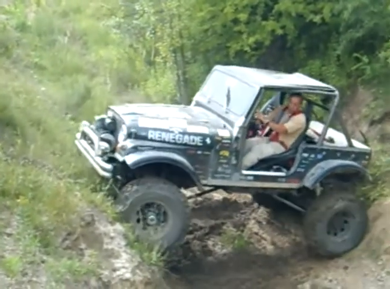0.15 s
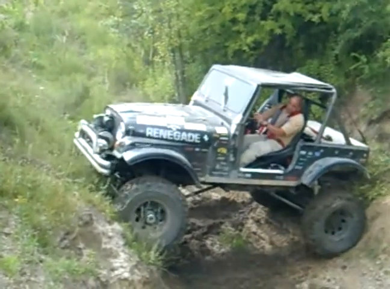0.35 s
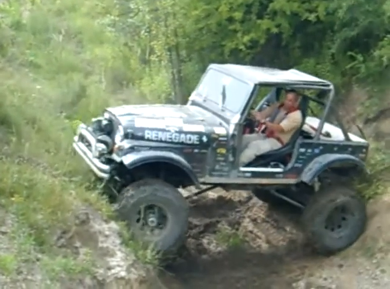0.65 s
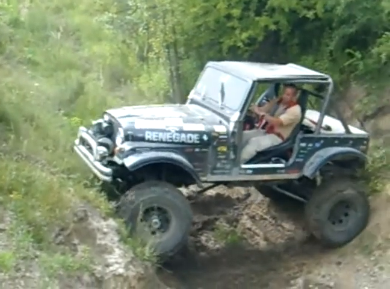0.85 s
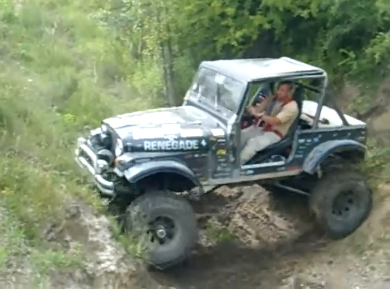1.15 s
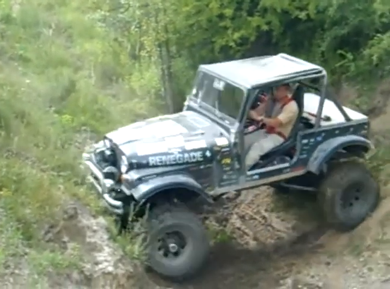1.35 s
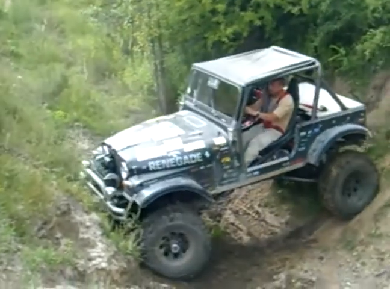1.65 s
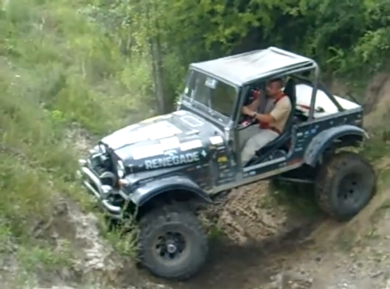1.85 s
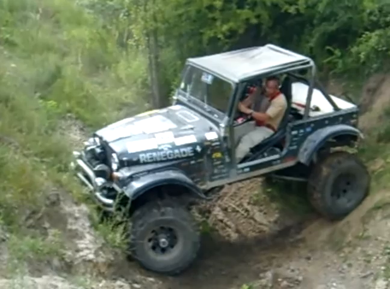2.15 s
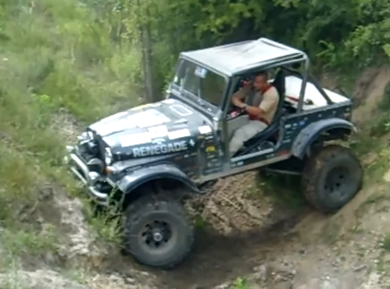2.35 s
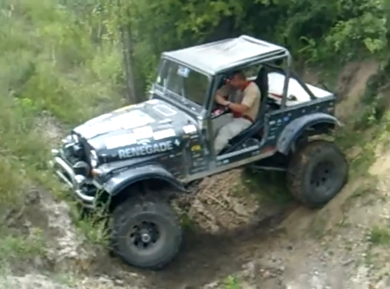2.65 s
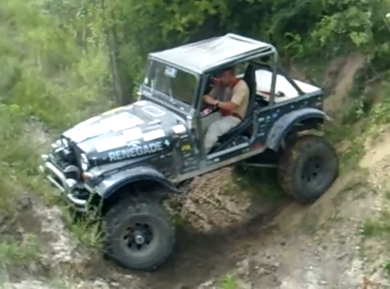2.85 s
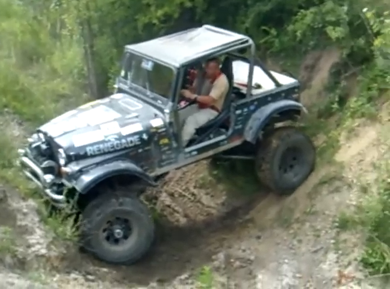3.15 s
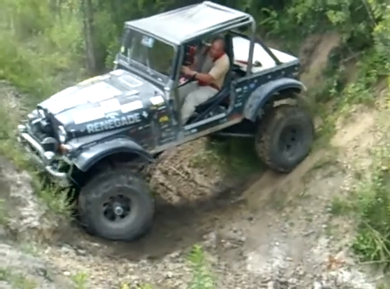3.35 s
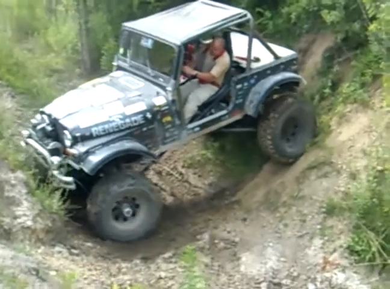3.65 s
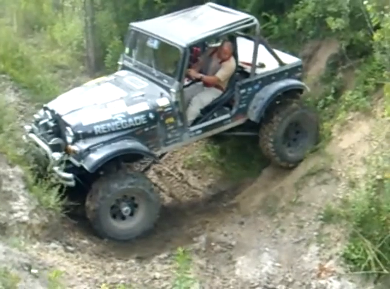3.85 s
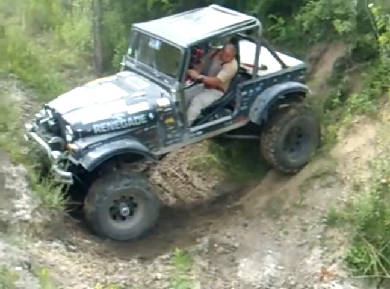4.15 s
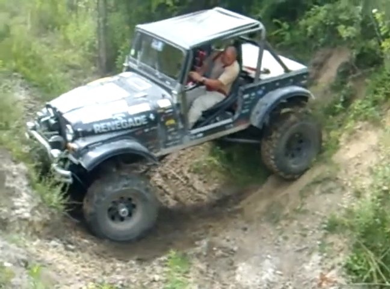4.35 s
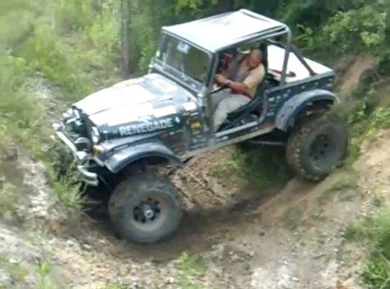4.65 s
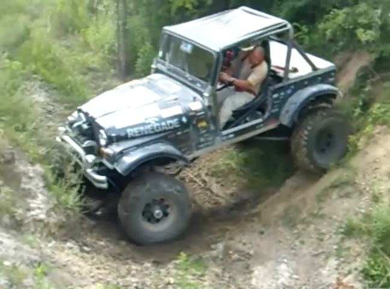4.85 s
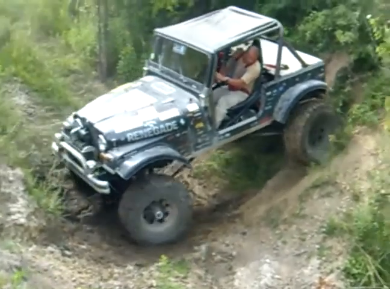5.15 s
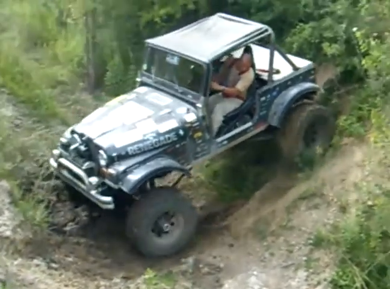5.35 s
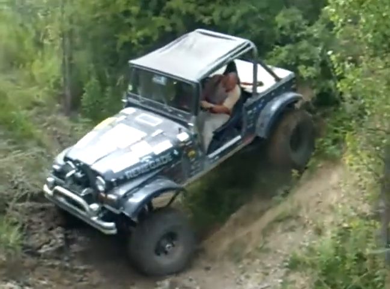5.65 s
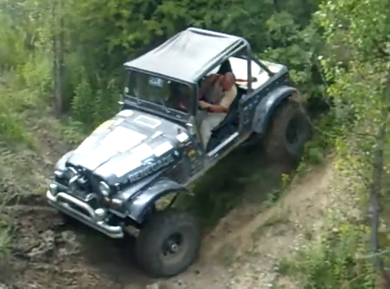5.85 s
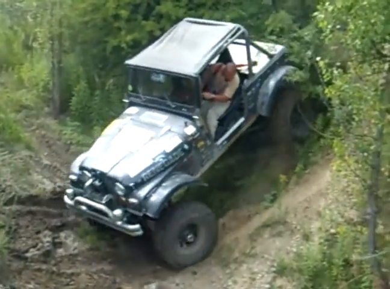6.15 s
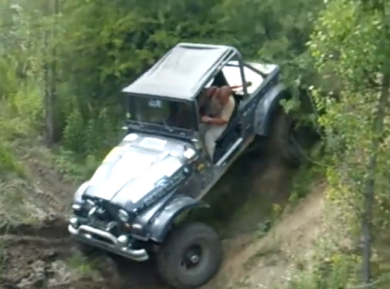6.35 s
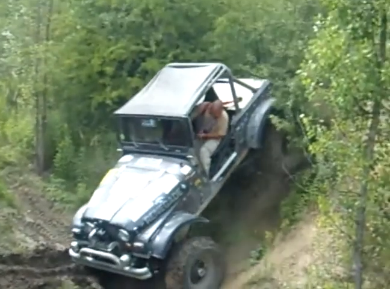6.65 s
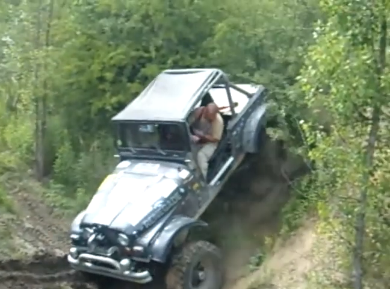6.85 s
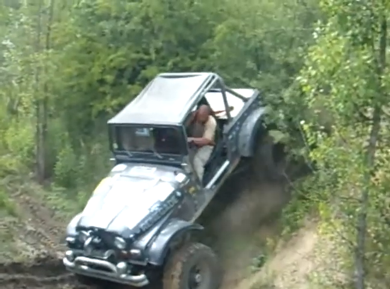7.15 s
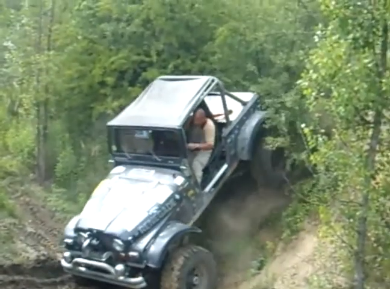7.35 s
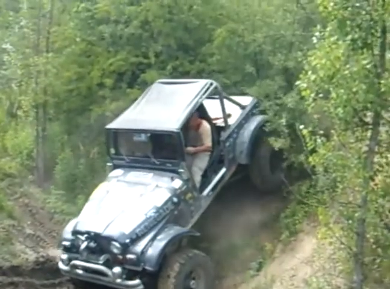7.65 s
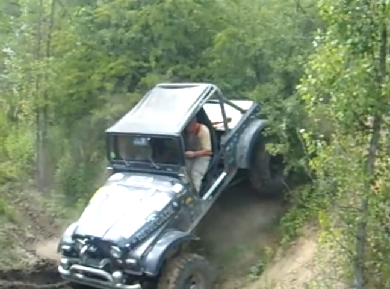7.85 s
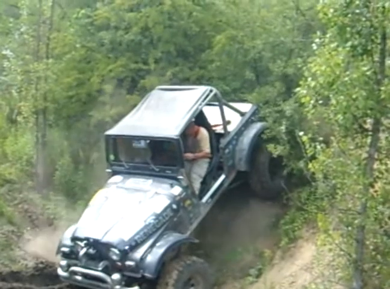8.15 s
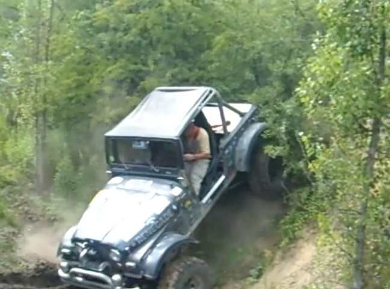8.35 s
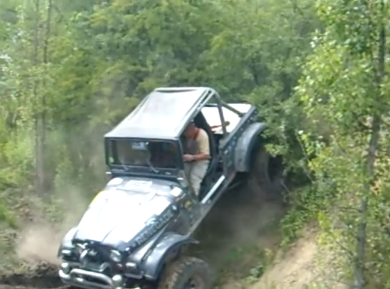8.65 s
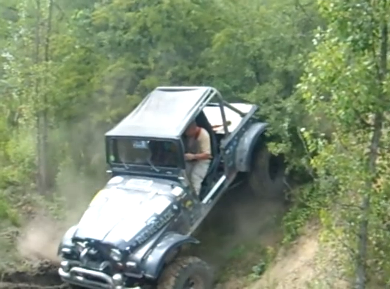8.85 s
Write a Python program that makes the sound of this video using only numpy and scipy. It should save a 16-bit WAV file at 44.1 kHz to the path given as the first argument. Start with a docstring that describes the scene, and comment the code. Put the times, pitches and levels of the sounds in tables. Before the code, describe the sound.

A big V8 off-roader blips its throttle three times on a dirt slope, howls at high revs, then sinks to a faltering, clinking idle.

```python
"""A V8 off-road vehicle revs in bursts on a dirt slope, then nearly stalls and lopes at idle.
Each firing drives tones and burble in the pipes, with gas roar, hiss and a rattle; pipe notes howl at
high revs and low thumps mark strong firings. Tyres crunch grit as short bursts of cracks, loose parts
clink as dying notes, the slope echoes both, and wind is low noise on the microphone.
A narrow-band recorder with a soft preamplifier cuts off the highest peaks."""
import sys
import numpy as np
from scipy import signal
from scipy.fft import rfft, irfft, next_fast_len
from scipy.io import wavfile
from scipy.ndimage import uniform_filter1d

SR = 44100
rng = np.random.default_rng(int(sys.argv[2]) if len(sys.argv) > 2 else 0)


def unload_audio(sound):
    """Save the sound as a 16-bit wav file, at the path given as the first command line argument."""
    columns = np.transpose(np.atleast_2d(sound))
    # keep every value between -1 and 1, then stretch to whole-number steps
    steps = np.round(np.clip(columns, -1, 1) * 32767)
    wavfile.write(sys.argv[1], SR, steps.astype(np.int16))


def how_loud(loudness_db):
    """Turn decibels into a plain amplitude multiplier (0 dB gives 1, 20 dB gives 10)."""
    steps = np.asarray(loudness_db, float) / 20
    return 10 ** steps


N = 397341
REFERENCE_HZ = 100  # firing rate at which the layers that follow the engine have their base level

# engine speed and its plain tone: t/s, firing rate f/Hz, tone level/dB (rms)
SPEED = [(0.0, 83.5, -22), (0.12, 80.6, -20.5), (0.26, 69.05, -23.5), (0.35, 63.8, -36), (0.6, 62.16, -34),
         (0.75, 64.6, -28), (0.84, 84.5, -14), (0.93, 106.5, -8.5), (1.0, 121.7, -12.5), (1.06, 129.5, -20),
         (1.18, 121.9, -17), (1.4, 107.1, -29.5), (1.65, 94.6, -30), (2.01, 81.5, -25),
         (2.36, 72.35, -31.5), (2.58, 68.55, -31.5), (2.8, 69.86, -29), (2.93, 95.2, -14),
         (3.0, 109.6, -14), (3.08, 116.5, -22), (3.21, 107.5, -26), (3.33, 110.9, -21), (3.67, 110.8, -25),
         (3.89, 93.7, -28), (4.06, 85.8, -31.5), (4.29, 84.2, -18), (4.42, 102.3, -18.5),
         (4.52, 114.3, -18.5), (4.59, 115.8, -26), (4.7, 103.1, -29), (4.79, 103.4, -18.5),
         (4.99, 134.7, -21), (5.12, 149.3, -26.5), (5.32, 157.1, -24.5), (5.54, 188.7, -12),
         (5.66, 205, -11.5), (5.77, 212.8, -15.5), (6.02, 206.9, -7.5), (6.15, 236.5, -20.5),
         (6.25, 260.5, -11), (6.34, 264.4, -19.5), (6.47, 238.6, -20.5), (6.56, 239.8, -10.5),
         (6.72, 272.9, -33.5), (6.85, 259.9, -18.5), (7.0, 225.1, -34.5), (7.2, 170.6, -32.5),
         (7.35, 125.4, -32), (7.5, 94.6, -25), (7.68, 75.06, -21.5), (7.83, 63.8, -33), (8.2, 44.53, -34),
         (8.44, 32.9, -38), (8.58, 54.87, -51), (8.75, 59.1, -38), (9.01, 57.2, -53)]


def evened(x):
    """Scales to rms 1."""
    return x / np.sqrt(np.mean(x ** 2) + 1e-20)


def columns(rows):
    """Table columns after the time, joined by straight lines at every sample."""
    s, *rest = np.transpose(rows)
    return [np.interp(np.arange(N) / SR, s, c) for c in rest]


def coloured(x, points):
    """Filters x by a spectrum of (Hz, dB) points."""
    size = next_fast_len(len(x))
    hz = np.fft.rfftfreq(size, 1 / SR)
    f, db = np.transpose(points)
    gain = how_loud(np.interp(np.log(hz + 1), np.log(f + 1), db))
    return irfft(rfft(x, size) * gain, size)[:len(x)]


def resonate(x, hz, width):
    """A fixed resonance with gain 1 at its centre."""
    return signal.lfilter(*signal.iirpeak(hz, hz / width, SR), x)


def slow(hz):
    """Smooth chance of rms 1 that wanders at rates up to about hz."""
    lowpass = signal.butter(2, hz, fs=SR, output="sos")
    return evened(signal.sosfilt(lowpass, rng.standard_normal(N)))


def add(mix, s, sound):
    """Mixes sound in from time s."""
    part = mix[round(s * SR):][:len(sound)]
    part += sound[:len(part)]


def steadied(x, size=6000):
    """Divides out the slow level so that engine speed alone does not set loudness."""
    power = uniform_filter1d(uniform_filter1d(x ** 2, size), size)
    return x / np.sqrt(power + 1e-12)


def smeared(x, longest_s=0.0296):
    """Each pitch leaves the pipes after its own delay, so pulses blur while their colour stays."""
    size = next_fast_len(len(x))
    delay = uniform_filter1d(rng.standard_normal(size // 2 + 1), size * 30 // SR)
    delay_s = longest_s * (1 + np.tanh(evened(delay))) / 2
    phase = 2 * np.pi * np.cumsum(delay_s) * SR / size
    return irfft(rfft(x, size) * np.exp(-1j * phase), size)[:len(x)]


def follows(flow_db, hz, base_db, flow_share, db_per_octave):
    """A layer grows with a share of the change in gas flow, and by some dB per octave of speed."""
    reference_flow_db = -25
    return base_db + flow_share * (flow_db - reference_flow_db) + db_per_octave * np.log2(hz / REFERENCE_HZ)


def pipe_lift(hz):
    """The pipes lift a tone (dB) near some notes, choke it near another and radiate deep tones little."""
    # notes of the pipes: f/Hz, width/Hz, lift/dB
    pipe_notes = [(95, 18, 3), (124, 16, 1.5), (192, 23, 8.5), (242, 44, -2), (298.3, 59.4, 9.5),
                  (550, 71, 7)]
    lift = sum(db / (1 + (2 * (hz - f) / w) ** 2) for f, w, db in pipe_notes)
    low = (80 / hz) ** 8
    high = (hz / 350) ** 16
    shelf_db = -5.5  # tones above about 350 Hz come out weaker
    return lift - 10 * np.log10(1 + low) + shelf_db * high / (1 + high)


def firing_tones(turns, hz, tone_db, bank_db):
    """Even firing gives one tone; banks that fire unevenly add tones at eighths of the firing rate."""
    # which eighths of the firing rate sound: number of eighths
    eighths = [5, 6, 11, 12, 13, 14, 15, 16, 21, 22, 23]
    # strength of each of these tones, relative to the bank level: level/dB
    eighth_levels = [-2.5, -4.5, -4, -12.5, -1.5, -6.5, -13, -1, -8, -14.5, -12.5]
    waver_db, wander_db, drift_rad = 1.4, 2.5, 0.2  # quick and slow unevenness of level, and of phase
    tones = how_loud(tone_db + waver_db * slow(27)) * np.sin(2 * np.pi * turns)
    for k, db in zip(eighths, eighth_levels):
        level_db = bank_db + db + pipe_lift(k / 8 * hz)
        level_db = level_db + wander_db * slow(2.27) + waver_db * slow(14)
        tones += how_loud(level_db) * np.sin(2 * np.pi * k / 8 * turns + drift_rad * slow(5.9))
    return np.sqrt(2) * tones  # so that the levels are rms


def firing_surplus(count, regular):
    """Each cylinder has its own strength, and no two cycles are alike."""
    # surplus of each firing over the mean, in firing order: relative strength
    cylinders = [1.21, 0.41, -0.38, 0.64, -0.85, -0.69, 0.69, 0.0055]
    pattern = evened(np.array(cylinders))[count % 8]
    chance = rng.standard_normal(count[-1] + 1)[count]
    return np.sqrt(regular) * pattern + np.sqrt(1 - regular) * chance


def burble(fired, surplus):
    """Uneven firing pulses and turbulent gas boom in the pipes."""
    # colour of a burble pulse leaving the pipes: f/Hz, level/dB
    pipe = [(15, -26), (45, -13), (80, -7), (110, -10), (135, -5), (160, -9), (190, 2), (215, 0),
            (260, -1.5), (300, -4.5), (325, -1.3), (350, -7.5), (385, -7), (600, -23), (1500, -53)]
    gas_share = 0.2
    pulses = steadied(coloured(smeared(fired * surplus), pipe))
    gas = evened(coloured(rng.standard_normal(N), pipe))
    return np.sqrt(1 - gas_share) * pulses + np.sqrt(gas_share) * gas


def roar(puff, fired, surplus, hz):
    """Each opening valve lets out a crack and a puff of gas, which ring the pipes and body."""
    # resonances of pipes and body: f/Hz, width of one pass/Hz, level/dB
    body = [(503, 124, 2.5), (645.6, 205, 2.5), (861, 256, 1), (1022, 690, -2), (1267, 1620, -9.5)]
    gate, rough, crack = 0.46, 0.97, 0.41  # share of puffs, unevenness of cracks, level of cracks
    gas = evened((1 - gate + gate * puff) * rng.standard_normal(N))
    drive = gas + crack * steadied(smeared(fired * (1 + rough * surplus), 0.008014))
    rung = np.zeros(N)
    for k, (f, w, db) in enumerate(body):
        twice = resonate(resonate(drive, f, w), f, w)
        rung += (-1.) ** k * how_loud(db) * twice
    rung = steadied(rung)
    # from 150 to 240 firings a second the roar spreads down into the gap under the body resonances
    fill = np.clip((hz - 150) / 90, 0, 1)
    thin = signal.sosfiltfilt(signal.butter(2, 380, "high", fs=SR, output="sos"), rung)
    return fill * rung + (1 - fill) * thin


def hiss(puff):
    """Escaping gas hisses, a little louder in each puff."""
    # colour of the hiss: f/Hz, level/dB per Hz
    hiss_colour = [(590, -18), (1000, 3.5), (1160, -24.5), (1430, -3), (1790, -7), (2240, -5), (4410, -8),
                   (5140, -10.5), (5600, -21), (7280, -68), (12300, -120)]
    gate = 0.17  # share of puffs
    return evened(coloured((1 - gate + gate * puff) * rng.standard_normal(N), hiss_colour))


def rattle(puff, hz, climb):
    """The engine bay rattles in a narrow band at each firing, more while revs climb."""
    noise = how_loud(3.0 * slow(30)) * puff * rng.standard_normal(N)
    centre_hz, width_hz = 4560, 500
    ring = steadied(resonate(resonate(noise, centre_hz, width_hz), centre_hz, width_hz))
    climb_hz_per_s = climb * hz * np.log(2)
    # dB relative to the hiss, dB per Hz/s of climb, dB per octave of speed
    return how_loud(-18.5 + 0.0556 * climb_hz_per_s - 4.5 * np.log2(hz / REFERENCE_HZ)) * ring


def engine():
    """Firing tones, burble, roar, hiss and rattle, all locked to the count of firings."""
    # gas flow, which sets the roar: t/s, level/dB
    load = [(0.0, -33), (0.45, -38.5), (0.79, -37), (0.84, -29), (0.93, -16.5), (1.0, -21), (1.06, -22.5),
            (1.2, -26), (1.96, -34.5), (2.76, -38), (2.88, -30.5), (2.96, -22), (3.06, -23), (3.14, -28),
            (3.59, -25), (3.84, -30.5), (4.24, -35), (4.36, -28.5), (4.54, -24), (4.72, -29.5), (4.89, -19),
            (5.19, -16), (5.5, -11.5), (5.92, -10), (6.17, -8), (6.5, -11), (6.7, -7.5), (7.0, -10.5),
            (7.25, -14), (7.53, -31), (7.73, -36.5), (8.1, -43), (8.35, -46), (8.51, -52), (8.56, -45),
            (8.66, -46), (8.72, -46), (9.01, -47)]
    # tailpipes face the microphone more or less as the vehicle turns and climbs: t/s, level/dB
    facing = [(0, 1), (1.0, 1.5), (1.8, 1.5), (2.8, 0.5), (3.4, -0.5), (4.6, 1), (5.3, -1.5), (6.0, -3.5),
              (6.9, 0), (7.4, -1), (9.01, -5)]
    # how evenly the cylinders repeat their pattern; steady load makes it regular: t/s, share 0-1
    regularity = [(0, .4), (.8, .4), (1.0, .5), (2.8, .5), (3.1, .85), (3.7, .85), (4.0, .6), (4.4, .8),
                  (5.6, .8), (6.0, .5), (7.2, .35), (9.01, .4)]
    hz, tone_db = columns(SPEED)
    flow_db, facing_db, regular = columns(load)[0], columns(facing)[0], columns(regularity)[0]
    climb = uniform_filter1d(np.gradient(np.log2(hz)) * SR, 8000)  # octaves a second
    hiss_db = follows(flow_db, hz, -30, 0.63, 3.87)
    burble_db = follows(flow_db, hz, -25, 0.83, -1.4) + facing_db
    bank_db = follows(flow_db, hz, -28, 0.5, -1.2) + facing_db
    bank_db += 20 * np.log10(regular / regular.max())
    bank_db += 9 * np.clip(climb, -1, 0)  # bank tones are weaker while revs fall

    turns = np.cumsum(hz) / SR  # firings so far
    count = turns.astype(int)
    fired = np.diff(count, prepend=0) > 0
    surplus = firing_surplus(count, regular)
    puff = np.exp(-(turns % 1) / 0.13)  # dies away within each firing

    low = firing_tones(turns, hz, tone_db, bank_db) + how_loud(burble_db) * burble(fired, surplus)
    high = how_loud(flow_db) * roar(puff, fired, surplus, hz)
    high += how_loud(hiss_db) * (hiss(puff) + rattle(puff, hz, climb))
    flutter = how_loud(0.53 * slow(12))
    return low + flutter * high


def howl():
    """Pipe notes sing as narrow bands of noise around a steady core, only at high revs."""
    # pipe notes: f/Hz, level/dB
    howl_notes = [(551, -16.5), (928, -22.5)]
    core, width_hz, wander_db = 0.9, 20, 1.0
    t, out = np.arange(N) / SR, np.zeros(N)
    for hz, db in howl_notes:
        turn = 2 * np.pi * hz * t + 2 * slow(5)
        note = (core + slow(width_hz)) * np.cos(turn) + slow(width_hz) * np.sin(turn)
        out += how_loud(db + wander_db * slow(3.7)) * note
    # they wake from 216 firings a second, fully 14 higher, and linger 0.19 s
    awake = np.clip((columns(SPEED)[0] - 216) / 14, 0, 1)
    return out * np.maximum(awake, np.interp(t - 0.19, t, awake))


def thumps(t60=0.13):
    """Lone strong firings push out gas that rings the exhaust briefly (t60 in seconds)."""
    # strong firings: t/s, level before rise and decay/dB, ring f/Hz
    strong_firings = [(0.351, -10.5, 72.7), (0.512, -11.5, 73), (0.597, -16, 61.9), (0.724, -11.5, 123),
                      (7.99, -20.5, 70), (8.198, -28, 93.7), (8.244, -18, 72.85), (8.546, -25.5, 70.1),
                      (8.619, -22, 72), (8.69, -25, 72), (8.763, -21, 72.7), (8.839, -22, 61.85),
                      (8.914, -34, 75.2), (8.999, -21, 82)]
    out, t = np.zeros(N), np.arange(5000) / SR
    rise = 1 - np.exp(-t / 0.0023)
    for s, db, hz in strong_firings:
        add(out, s, how_loud(db - 60 * t / t60) * np.sin(2 * np.pi * hz * t) * rise)
    return out


def crunches(grains_per_s=2500, spread_db=1.5, width=0.6):
    """Tyres crush and throw grit: dense cracks of uneven size in a broad band, swelling and fading."""
    # bursts: t/s, rms level before the swell/dB, length/s, centre f/Hz
    grit = [(0.51, -39, 0.012, 4270), (2.325, -31.5, 0.035, 2430), (2.355, -30.5, 0.039, 2760),
            (2.382, -30, 0.058, 2650), (2.347, -29.5, 0.08, 1390), (2.38, -25, 0.062, 750),
            (3.572, -25, 0.049, 2450), (3.602, -25, 0.057, 4190), (3.701, -23, 0.0079, 3000),
            (7.994, -45, 0.019, 3510), (8.366, -43, 0.01, 2980), (8.54, -42, 0.03, 2765),
            (8.58, -40.5, 0.02, 2760), (8.609, -46, 0.048, 2500), (8.683, -44, .035, 2990),
            (8.764, -56, 0.033, 3500), (8.832, -44, 0.059, 2772), (9.003, -31, 0.033, 1454)]
    out = np.zeros(N)
    chance = rng.random((len(grit), 2, 8192))
    for (s, db, length, hz), (draw, size) in zip(grit, chance):
        sizes = np.sign(size - .5) * how_loud(-spread_db * np.log(abs(2 * size - 1) + 0.03))
        cracks = (draw < grains_per_s / SR) * sizes
        t = np.arange(8192) / SR / length  # 0 to 1 through the burst
        swell = np.sin(np.pi * np.minimum(t, 1) ** 0.6)
        add(out, s, how_loud(db) * evened(resonate(cracks, hz, width * hz)) * swell)
    return out


def clinks():
    """Each loose metal part rings a dying close pair of notes."""
    # clinks: t/s, main note level before rise and decay/dB, f/Hz, time to fall 60 dB/s
    loose_parts = [(3.141, -28, 2360, 0.23), (8.089, -28.5, 898, 0.17), (8.213, -38, 996, 0.14),
                   (8.265, -37, 551.6, 0.14), (8.578, -35, 3700, 0.051), (8.58, -35, 2060, 0.056),
                   (8.683, -26, 3735, 0.022), (8.689, -24.5, 4120, 0.05), (8.689, -34, 1300, 0.072),
                   (8.761, -38, 4060, 0.043), (8.845, -37, 4120, 0.074), (8.85, -49, 1730, 0.34),
                   (8.87, -44, 1860, 0.28), (8.889, -50, 4100, .1)]
    out, t = np.zeros(N), np.arange(12000) / SR
    rise = 1 - np.exp(-t / 0.00057)
    for s, db, hz, t60 in loose_parts:
        pair = np.sin(2 * np.pi * hz * t) + 0.27 * np.sin(2 * np.pi * 0.91 * hz * t)
        add(out, s, how_loud(db - 60 * t / t60) * pair * rise)
    return out


def slope(x, echo_db=-9, t60=.25):
    """Adds scattered, dying echoes from the bank and trees (t60 in seconds)."""
    t = np.arange(12000) / SR
    taps = rng.choice([-1., 1.], 12000) * (rng.random(12000) < .05)
    taps = taps * how_loud(-60 * t / t60) * (t > .006)
    return x + how_loud(echo_db) * signal.fftconvolve(x, taps / np.linalg.norm(taps))[:N]


def wind():
    """Lumpy low pressure on the microphone, with a few stronger puffs."""
    # puffs of wind: t/s, level at the height of the puff/dB
    gusts = [(0.059, -33), (1.0, -31), (1.42, -31), (1.68, -29), (1.9, -39), (2.53, -31), (3.21, -35),
             (3.75, -24), (4.07, -40), (6.37, -26), (7.28, -28), (7.98, -32), (8.56, -39)]
    noise = coloured(rng.standard_normal(N), [(8, -20), (20, -6), (28, 10.0), (45, 1.0), (90, -48.5)])
    t = np.arange(N) / SR
    puffs = sum(how_loud(db) * np.exp(-((t - s) / 0.039) ** 2) for s, db in gusts)
    steady = how_loud(-48 + 5.5 * slow(2.4))
    return (steady + puffs) * steadied(noise)


def scene():
    """Vehicle on the slope plus wind."""
    vehicle = engine() + howl() + thumps()
    return (vehicle + slope(crunches() + clinks()) + wind())[None]


def roll_off(x):
    """The treble ends steeply here."""
    return signal.sosfilt(signal.butter(12, 15870, fs=SR, output="sos"), x)


def record(dry, knee=1.0):
    """The preamplifier saturates softly; the recorder keeps a narrow band and overloads hard."""
    soft = knee * np.tanh(dry / knee)
    lowpass = signal.firwin(201, 5920, window=("kaiser", 9), fs=SR)
    narrow = signal.oaconvolve(soft, lowpass[None], "same")
    finished = np.clip(narrow, -.715, .715)
    return roll_off(finished)


dry = scene()
out = record(dry)
unload_audio(out)
```